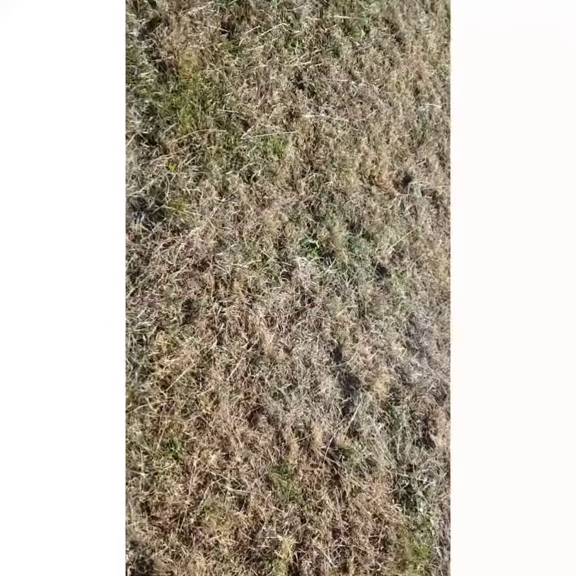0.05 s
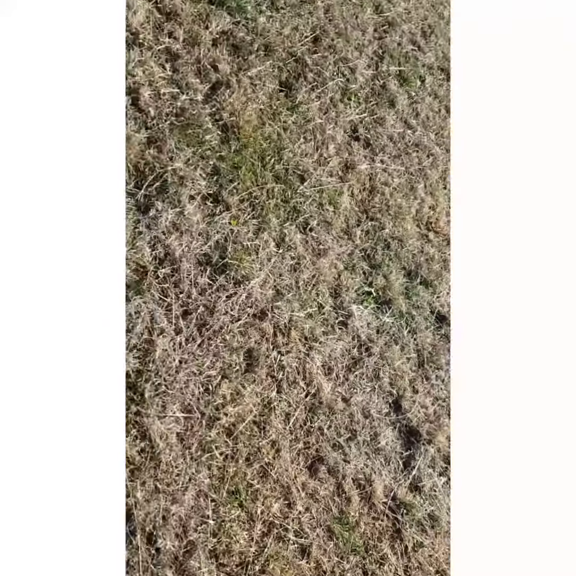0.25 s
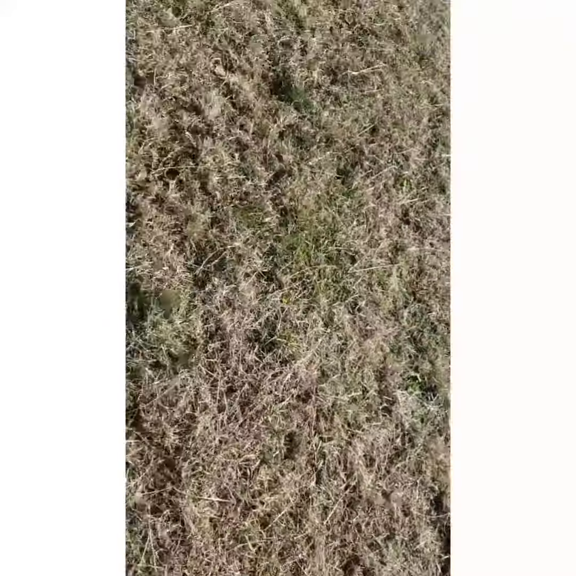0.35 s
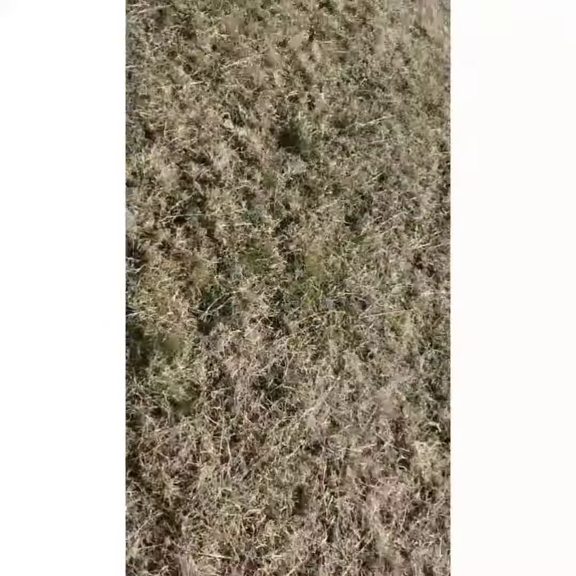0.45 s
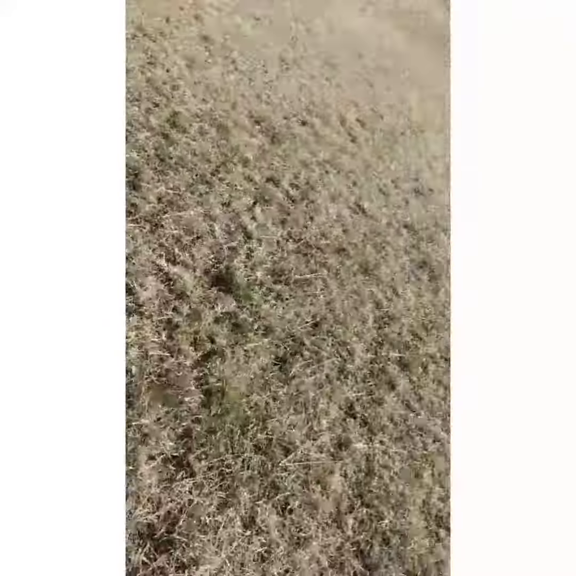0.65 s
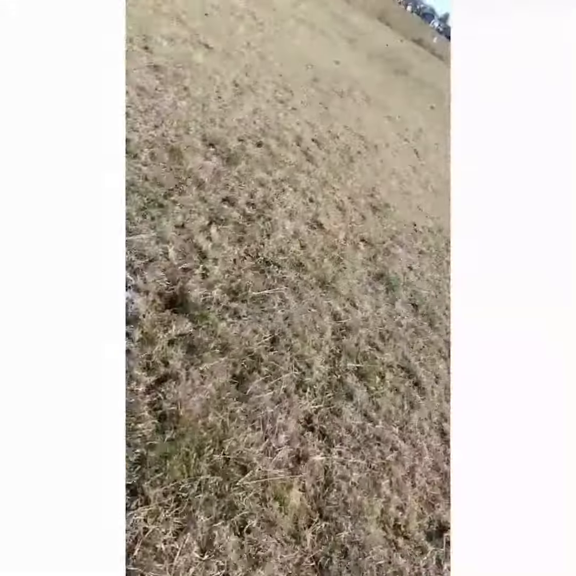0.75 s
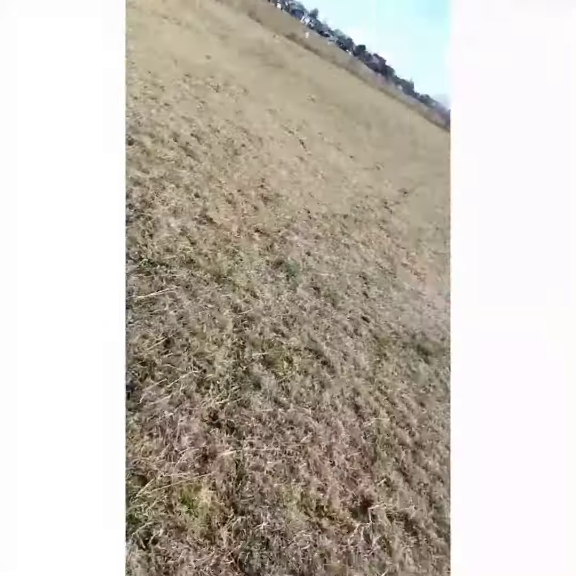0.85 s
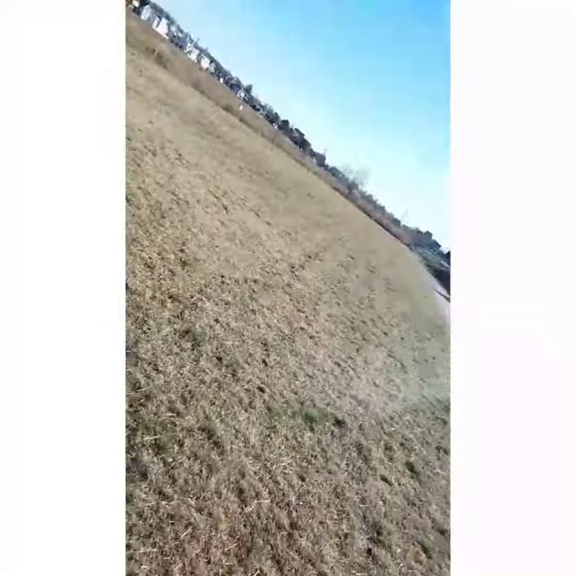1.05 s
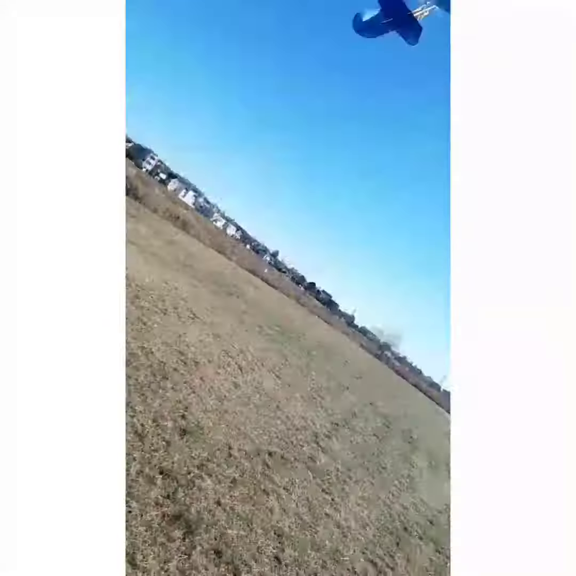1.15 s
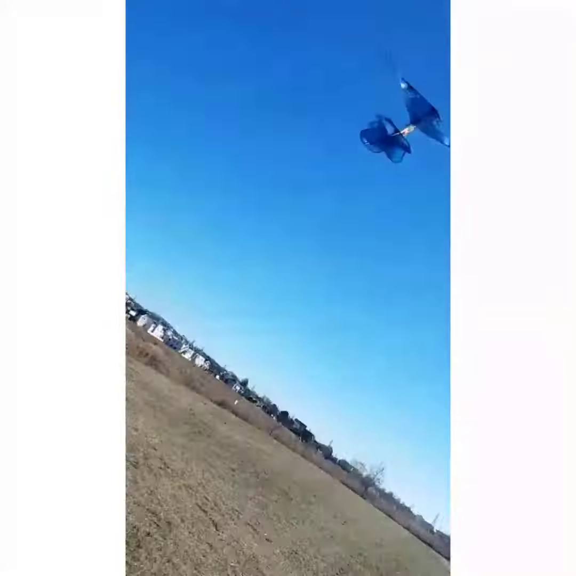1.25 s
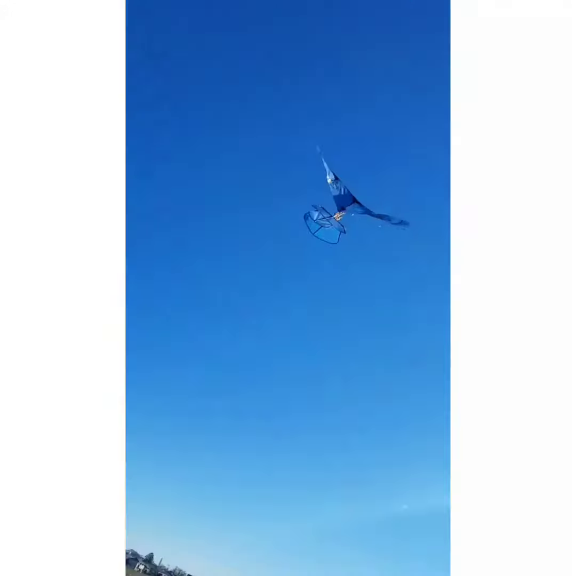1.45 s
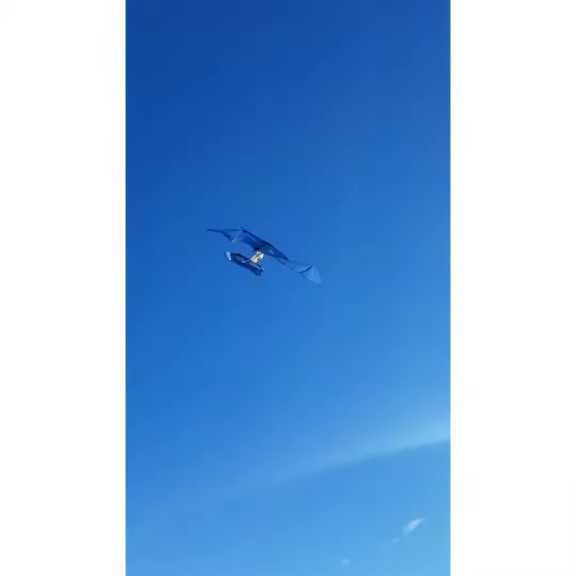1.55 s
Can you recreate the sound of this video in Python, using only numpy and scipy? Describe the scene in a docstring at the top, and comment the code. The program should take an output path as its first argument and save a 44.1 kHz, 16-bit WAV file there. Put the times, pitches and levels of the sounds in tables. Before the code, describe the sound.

Thin toy wings flap and crackle rapidly, growing fainter over a light breeze.

```python
"""Flapping model flies away

A small flapping-wing model is let go by hand over a grass field, with a few knocks and a clack.
Each wing stroke snaps the thin film taut, crinkles it and pushes air. Single creases tick, and
the wings thump as they billow out close by. The beats fade with distance over a faint breeze."""
import sys
import numpy as np
from scipy import signal
from scipy.fft import rfft, irfft
from scipy.io import wavfile
from scipy.ndimage import map_coordinates

SR = 44100
rng = np.random.default_rng(int(sys.argv[2]) if len(sys.argv) > 2 else 0)


def dump_mix(stems):
    """Bounce the given channels to the path in sys.argv[1] as a 16-bit WAV at rate SR."""
    frames = np.atleast_2d(stems).T  # one column per channel
    limited = np.clip(frames, -1, 1)  # hard clip at full scale
    pcm = np.round(limited * 32767).astype(np.int16)
    wavfile.write(sys.argv[1], SR, pcm)


N = 70560
T, HZ = np.arange(N) / SR, np.fft.rfftfreq(N, 1 / SR)

# Tone colours, showing which pitches are strong in each sound: f/Hz, relative level/dB
BREEZE_TONE = [(20, -24), (60, 6), (150, 1), (260, 1.5), (460, 4), (1000, -1.5), (2200, 0), (4000, -7.5),
               (7000, -11), (9400, -27), (12500, -14), (16000, -7)]
KNOCK_TONE = [(40, -8), (180, -9), (380, -1), (680, 6.5), (1000, -3), (1500, -4.5), (2200, -9.5),
              (5000, -17.5), (9400, -30), (15000, -20)]
TICK_TONE = [(100, -5), (500, -5), (1300, 3), (4800, -1.5), (7000, -1.5), (9400, -27), (15000, -11)]
FILM_TONE = [(60, -24.5), (160, -17), (300, -1), (520, 1.5), (850, 1.5), (1400, -1), (2400, -0.5),
             (4000, -3.5), (7000, -6), (9400, -16.5), (12000, -9.5), (16000, -7)]
AIR_PUSH_TONE = [(20, -10), (60, -15.5), (110, 1.5), (165, -3.5), (230, -0.5), (450, -4), (800, -12.5),
                 (2000, -28.5), (8000, -82)]
CLACK_TONE = [(60, -19), (300, 0), (750, 0.5), (1000, -1.5), (1330, 7), (1750, -2), (2600, -1), (3800, -6),
              (5500, -7), (9400, -25), (13000, -19.5), (16000, -24)]
# Knocks of the hand on the model: t/s, level/dB, fall/s
HAND_KNOCKS = [(0.1487, -46.5, 0.0049), (0.1689, -42.5, 0.011), (0.196, -43, 0.0048), (0.2766, -25, 0.0035),
               (0.3084, -29.5, 0.0069)]
# Dry ticks, first the release catch letting go, then single creases flipping over: t/s, level/dB
SHARP_TICKS = [(0.2147, -23), (0.3528, -26), (0.3932, -34), (0.406, -26), (0.4628, -22), (0.4727, -27),
               (0.5636, -30), (0.7547, -32), (0.784, -32), (0.8304, -25.5), (1.0437, -35), (1.221, -46)]
# Rustle of the slack film between strokes: t/s, level/dB
SLACK_RUSTLE = [(.225, -42), (.262, -41.5), (.305, -35.5), (.333, -27.5), (.375, -37.5), (.45, -41.5),
                (.525, -38.5), (.61, -69), (.71, -45.5), (.8, -44), (.826, -43.5), (.86, -37), (.91, -31.5),
                (.95, -34.5), (.98, -50), (1.12, -62), (1.27, -64), (1.38, -55), (1.6, -58)]
# Wing strokes: t/s, length/s, crinkle/dB, opening snap/dB, closing snap/dB, air push/dB, treble/dB
WING_STROKES = [(0.342, 0.014, -24.5, -24.5, -26.5, -37.5, -5.5),
                (.391, 0.034, -27.5, -33, -25.5, -37.5, 2.5),
                (0.464, 0.0335, -29.5, -28.5, -25.5, -50, 0.5), (0.548, 0.049, -34, -28.5, -37, -62, 4),
                (0.63, 0.052, -39, -33, -36.5, -52, 6.5), (0.739, 0.034, -36.5, -34.5, -60, -71, 6),
                (0.829, 0.023, -33, -35, -35, -71, 3), (0.914, 0.0056, -37, -27, -27.5, -40.5, 1.5),
                (1.039, 0.037, -41, -35.5, -44.5, -63, -2), (1.186, 0.027, -41, -35, -41, -63, -1),
                (1.315, 0.025, -41, -58, -38, -64, 1), (1.414, 0.023, -41.5, -60, -38.5, -56.5, -0.5),
                (1.513, 0.037, -43.5, -62, -47.5, -58, 0), (1.594, 0.029, -49, -64.5, -54, -69, -0.5)]
# Clacks of the frame as it is let go: t/s, level/dB, rise/s, fall/s
FRAME_CLACKS = [(0.2304, -26.5, 0.0009, 0.0014), (0.2356, -28.5, 0.012, 0.0078)]
# Thumps of the wings billowing out: t/s, level/dB, deep share (0 to 1)
WING_THUMPS = [(0.342, -27.5, 0.37), (0.393, -39, 0), (0.426, -28, 0.98), (.499, -28.5, 0.46),
               (0.552, -45, 0.2), (0.599, -39, 0.84), (0.921, -27, 0)]
# Hollow notes of the taut wing: f/Hz, level/dB
WING_NOTES = [(345, -16), (510, -2), (615, 1)]
# Where the model is heard: t/s, right side's delay/ms, left minus right/dB, width
FLIGHT_PATH = [(.33, 0.35, 2, 3.1), (.42, 0.33, 0, 8.3), (0.556, 0.084, -0.5, 0.35), (.65, 0.15, 0.2, 2.8),
               (.74, .27, 0, 0.22), (.84, 0.25, 0, 2), (.91, 0.45, 1, 0.37), (.95, 0.45, -0.5, 0.32),
               (1.06, 0.35, -0.5, 1.1), (1.2, 0.2, -0.5, 0.5), (1.33, 0.12, 0, 0.78), (1.6, 0.044, -3, 5.6)]
# How alike left and right are at width 1: f/Hz, likeness (0 to 1)
SIDE_LIKENESS = [(40, 0.41), (250, 0.78), (600, 0.9), (1500, 0.75), (5000, 0.17), (16000, 0.062)]
# How the two microphones differ in tone: f/Hz, left minus right/dB
MIC_BALANCE = [(100, -1), (600, -0.7), (1300, -0.5), (2600, -3), (5000, -3), (9000, 0.7), (15000, -0.4)]


def amp(db):
    """Turns decibels into a factor to multiply by."""
    return 10 ** (np.asarray(db) / 20)


def unit_power(x):
    """Scales a signal to an average power of 1."""
    return x / np.sqrt(np.mean(x ** 2) + 1e-20)


def curve(points):
    """Joins (frequency, value) points into a curve over all frequencies."""
    hz, value = np.transpose(points)
    return np.interp(np.log(HZ + 1), np.log(hz + 1), value)


def colour(x, tone):
    """Gives a sound a tone colour; white noise keeps its power."""
    cepstrum = irfft(np.log(unit_power(amp(curve(tone)))), N)
    cepstrum[1:N // 2] *= 2  # folded so the filter rings only after a hit
    cepstrum[N // 2 + 1:] = 0
    taps = irfft(np.exp(rfft(cepstrum)), N)[:4096]
    return signal.fftconvolve(x, taps[None], axes=1)[:, :N]


def pair(signals, width=1):
    """Makes two unrelated signals partly alike; the wider the source, the less alike."""
    hz, t, (left, other) = signal.stft(signals, SR, nperseg=256)
    likeness = np.interp(hz, HZ, curve(SIDE_LIKENESS))
    same = likeness[:, None] ** np.interp(t, T, width * np.ones(N))
    right = same * left + np.sqrt(1 - same ** 2) * other
    return signal.istft(np.array([left, right]), SR, nperseg=256)[1][:, :N]


def noise(width=1):
    """An even hiss (white noise), left and right."""
    return pair(rng.standard_normal((2, N)), width)


def treble(x, corner_hz=1940):
    """The high part of a sound."""
    return irfft(rfft(x) * HZ ** 2 / (HZ ** 2 + corner_hz ** 2), N)


def burst(start, rise, fall, hold=0):
    """A loudness shape that swells up to the start, holds, then dies away."""
    return np.exp(np.minimum(T - start, 0) / rise - np.maximum(T - start - hold, 0) / fall)


def waver(rate_hz):
    """A smooth random wobble, mostly slower than the given rate."""
    return unit_power(irfft(rfft(rng.standard_normal(N)) * np.exp(-(HZ / rate_hz) ** 2), N))


def breeze(level_db=-57, waver_db=1.6, gust_s=1.135, gust_half_s=0.032, gust_db=5.5):
    """Faint, wavering wind in dry grass, with one brief gust that lifts its lower part."""
    air = colour(noise(width=13), BREEZE_TONE) * amp([[-0.8], [0.8]])
    gust = amp(gust_db * np.exp(-((T - gust_s) / gust_half_s) ** 2))
    high = treble(air)
    return amp(level_db + waver_db * waver(rate_hz=7.8)) * (high + gust * (air - high))


def knocks(rise_s=0.00035):
    """Handling the model makes a few dull knocks."""
    hits = sum(amp(db) * burst(t, rise_s, fall) for t, db, fall in HAND_KNOCKS)
    return colour(hits * noise(), KNOCK_TONE)


def ticks(rise_s=0.0003, fall_s=0.0019):
    """The release catch lets go with a dry, bright tick, and single creases then flip over with ticks of the
    same colour."""
    flips = sum(amp(db) * burst(t, rise_s, fall_s) for t, db in SHARP_TICKS)
    return colour(flips * noise(), TICK_TONE)


def crinkle(clicks_per_s=5000, spread_db=3.5, hiss_share=0.72, pops_per_s=80, pop_db=1, pop_s=0.00073):
    """The film buckles in tiny clicks over a fluttering hiss; now and then a larger crease pops."""
    sizes = amp(spread_db * np.minimum(rng.exponential(1, N), 4))
    buckles = rng.random(N) < clicks_per_s / SR
    clicks = unit_power(sizes * buckles * rng.choice([-1., 1.], (2, N)))
    grains = np.sqrt(1 - hiss_share) * clicks + np.sqrt(hiss_share) * rng.standard_normal((2, N))
    pop_starts = 1. * (rng.random(N) < pops_per_s / SR)
    pops = signal.lfilter([1], [1, -np.exp(-1 / (pop_s * SR))], pop_starts)  # each dies away
    pop_gain = unit_power(np.hypot(1, amp(pop_db) * pops))
    flutter = amp(0.95 * waver(rate_hz=103))
    t, _, _, width = np.transpose(FLIGHT_PATH)
    return pair(grains, np.interp(T, t, width)) * pop_gain * flutter


def slack_rustle(rise_db_per_s=490.5):
    """How strongly the loose film rustles, starting quickly at the release."""
    fade_in_db = rise_db_per_s * np.minimum(T - SLACK_RUSTLE[0][0], 0)
    return amp(np.interp(T, *np.transpose(SLACK_RUSTLE)) + fade_in_db)


def clacks(side_db=6):
    """The light frame clacks as it is let go, off to the left."""
    hits = sum(amp(db) * burst(t, rise, fall) for t, db, rise, fall in FRAME_CLACKS)
    return colour(hits * noise(width=9.9), CLACK_TONE) * amp([[side_db], [-side_db]])


def snap(start, db, rise_s, fall_s=0.013):
    """The power of the film going taut with a short rattle."""
    return (amp(db) * burst(start, rise_s, fall_s, hold=0.0017)) ** 2


def wings(swell_s=0.011, relax_s=0.0094, snap_rise_s=0.00062, sag_db=2.5, slack_air_db=-14.5):
    """Each stroke snaps the film at both ends, crinkles it in between and pushes air."""
    rustle = slack_rustle()
    low_power, high_power = rustle ** 2, rustle ** 2
    push = amp(slack_air_db) * rustle  # even slack film stirs some air
    for start, length, crinkle_db, open_db, close_db, push_db, treble_db in WING_STROKES:
        end = start + length
        lead_in = amp(np.interp(T, [start - snap_rise_s, start], [-1, 0]))  # softer before the snap
        stroke = burst(start, swell_s, relax_s, hold=length) * lead_in
        crinkling = amp(crinkle_db + np.interp(T, [start, end], [sag_db / 2, -sag_db / 2])) * stroke
        power = crinkling ** 2 + snap(start, open_db, snap_rise_s) + snap(end, close_db, snap_rise_s)
        low_power += power
        high_power += power * amp(treble_db) ** 2
        push += amp(push_db) * stroke * np.interp(T, [start, end], [0.57, 1])  # grows over the stroke
    grains = crinkle()
    high = treble(grains)
    film = np.sqrt(low_power) * (grains - high) + np.sqrt(high_power) * high
    return colour(film, FILM_TONE) + colour(push * noise(), AIR_PUSH_TONE)


def billows(deep_hz=170, rise_s=0.0018, fall_s=0.0034):
    """The wings billow out with short thumps: hollow notes plus a deep swing of the whole film."""
    thumps = np.zeros(N)
    for t, db, deep_share in WING_THUMPS:
        hollow = sum(amp(note_db) * np.sin(2 * np.pi * (hz * (T - t) + rng.random()))
                     for hz, note_db in WING_NOTES)
        deep = np.sin(2 * np.pi * deep_hz * (T - t))
        ring = np.sqrt(1 - deep_share) * hollow + np.sqrt(2 * deep_share) * deep
        thumps += amp(db) * burst(t, rise_s, fall_s) * ring
    return thumps


def wake(time_s=0.428, half_length_s=0.016, level_db=-40.5):
    """Air thrown off by the nearest stroke hits each microphone with a deep puff."""
    puff = amp(level_db) * np.exp(-((T - time_s) / half_length_s) ** 2)
    return puff * np.array([waver(rate_hz=90) for _ in range(2)])


def flight(x):
    """Places the model: its sound reaches the right side later, and the balance shifts."""
    t, delay_ms, balance_db, _ = np.transpose(FLIGHT_PATH)
    delay_samples = np.interp(T, t, delay_ms) * SR / 1000
    right = map_coordinates(x[1], [np.arange(N) - delay_samples], order=5)
    side = amp(np.interp(T, t, balance_db) / 2)
    return np.array([x[0] * side, right / side])


def scene():
    """The breeze, the launch and the flight together."""
    return breeze() + knocks() + clacks() + flight(ticks() + wings() + billows()) + wake()


def record(dry, top_hz=16000):
    """Gives each microphone its own tone and cuts the very highest treble."""
    heard = irfft(rfft(dry) * amp(np.outer([1, -1], curve(MIC_BALANCE)) / 2), N)
    low_pass = signal.firwin(511, top_hz, window=("kaiser", 9), fs=SR)
    return signal.oaconvolve(heard, low_pass[None], "same")


dry = scene()
out = record(dry)
dump_mix(out)
```